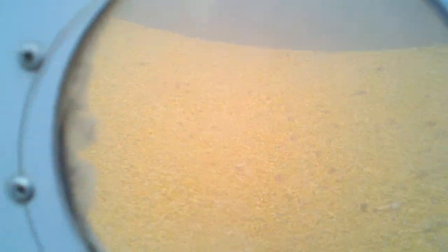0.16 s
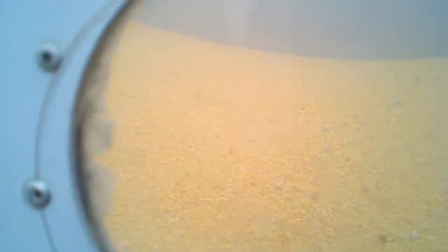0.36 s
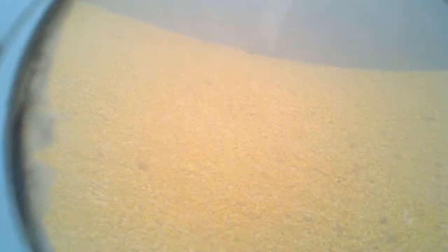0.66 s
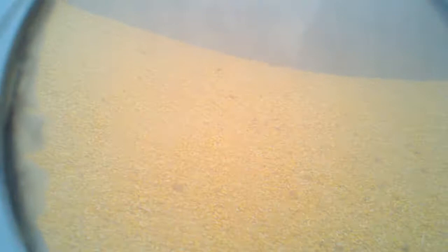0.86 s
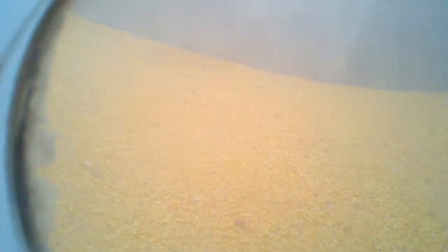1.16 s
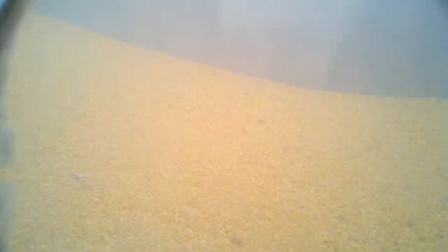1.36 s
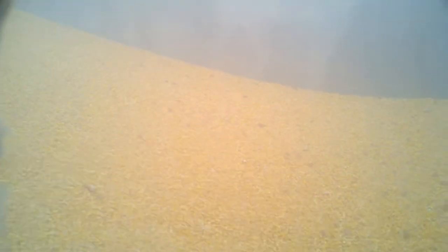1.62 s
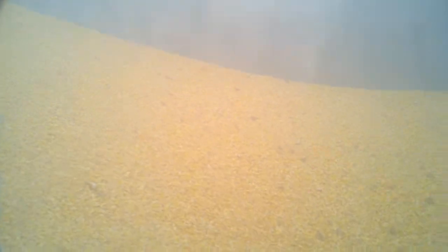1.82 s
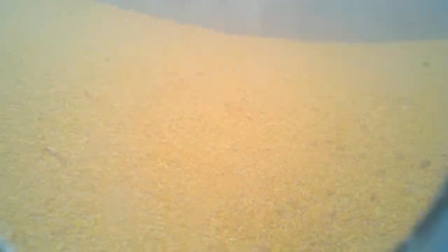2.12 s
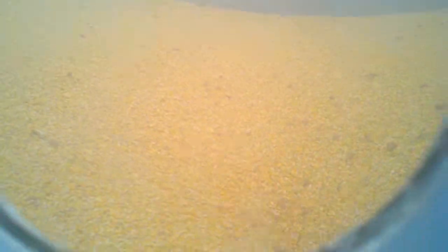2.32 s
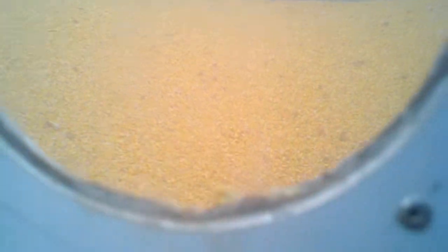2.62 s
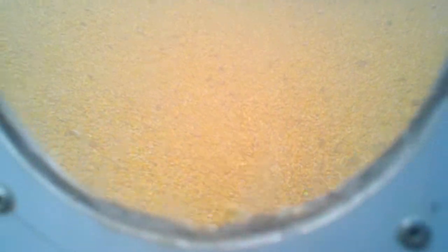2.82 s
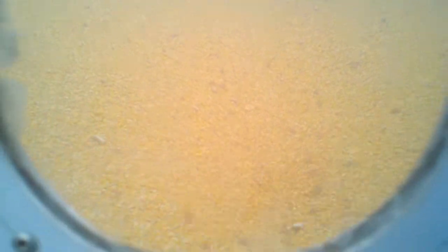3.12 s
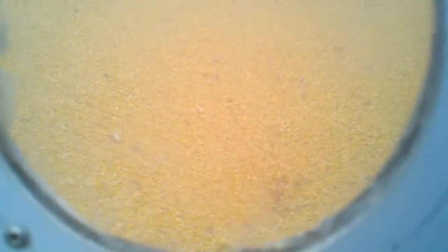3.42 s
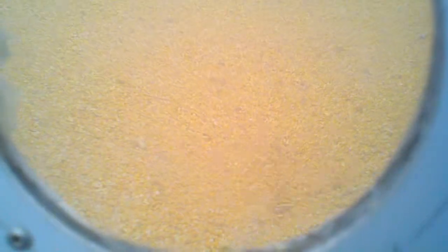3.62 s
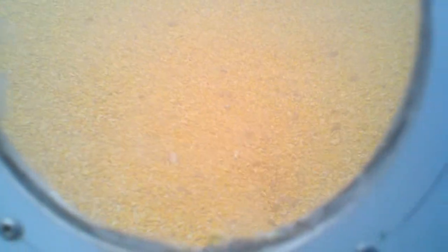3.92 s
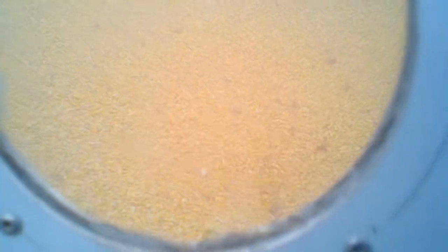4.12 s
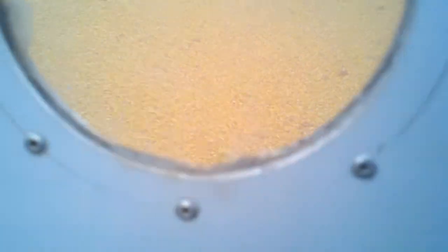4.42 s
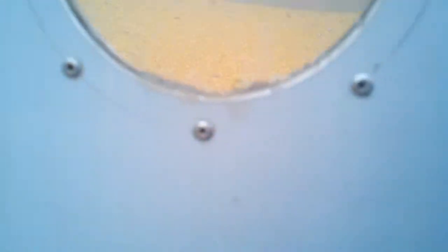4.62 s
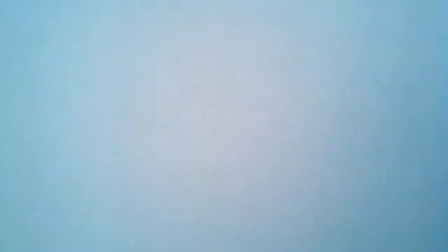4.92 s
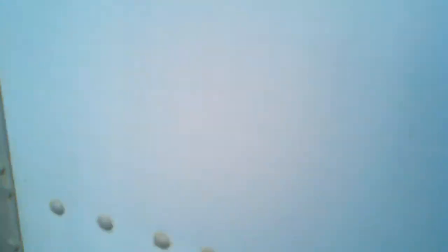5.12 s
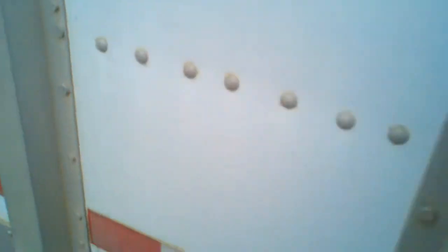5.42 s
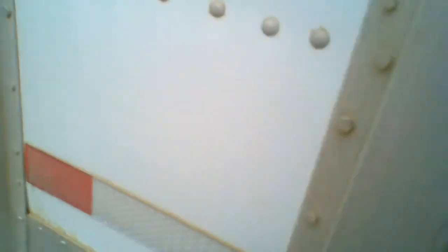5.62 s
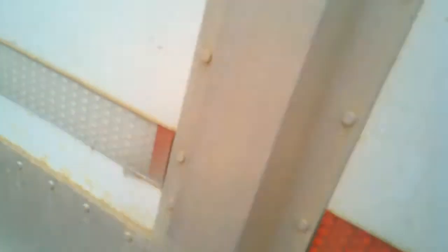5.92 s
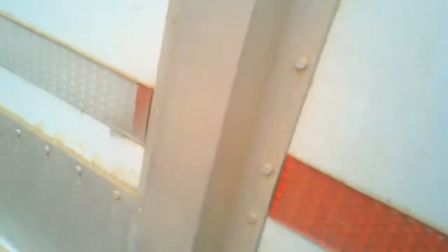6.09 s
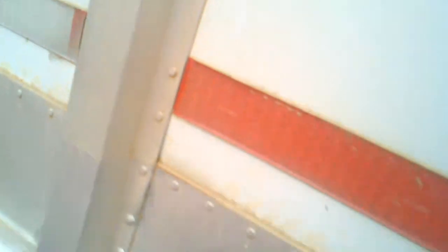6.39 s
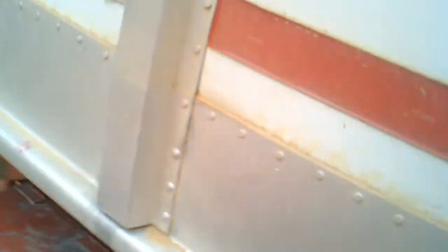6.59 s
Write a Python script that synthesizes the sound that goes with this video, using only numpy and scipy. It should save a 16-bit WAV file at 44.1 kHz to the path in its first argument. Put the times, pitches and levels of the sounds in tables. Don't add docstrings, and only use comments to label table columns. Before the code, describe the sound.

Loud, constant farm engine rumble and dense grainy hiss of flowing corn, dulling slightly late as low wind thumps hit the microphone.

```python
import sys
import numpy as np
from scipy import signal
from scipy.io import wavfile
from scipy.ndimage import uniform_filter1d, map_coordinates

SR = 44100
rng = np.random.default_rng(int(sys.argv[2]) if len(sys.argv) > 2 else 0)


def wav_record(signal):
    frames = np.transpose(np.atleast_2d(signal))
    bounded = np.clip(frames, -1, 1)
    quanta = np.round(bounded * 32767).astype(np.int16)
    wavfile.write(sys.argv[1], SR, quanta)


def invert_db(x):
    u = np.asarray(x, float) / 20
    return 10 ** u


N = 297655
TIME = np.arange(N) / SR
CYCLE_HZ = 16.9267
PORT_LAG = 17

# time in seconds, facing the engine casing [0-1],
# trailer wall in the way [0-1], nearness of the corn in dB.
CAMERA_HOLD = [(0, 0, 0, -0.7), (.75, .3, 0.01, 0.1), (1.05, 0.98, 0, -.6), (2.15, 0.87, 0, -1.1),
               (2.45, 0.4, 0, -0.2), (3.6, 0.06, 0.04, -0.1), (4.5, 0.1, 0.07, -.2), (4.9, .15, 0.05, 0),
               (5.3, 0.5, 0.18, 1.7), (5.7, 0.66, .3, 1.6), (5.9, 0.75, 0.4, 1), (6.08, 0.7, 0.58, 1.5),
               (6.25, 0.6, 0.9, 0.7), (6.75, 0.6, 1, 0)]


def curve(table):
    s, *columns = np.transpose(table)
    return [np.interp(TIME, s, column) for column in columns]


def at(table, hz):
    table_hz, values = np.transpose(table)
    return np.interp(np.log(hz + 1), np.log(table_hz), values)


def walk(rate, count, times):
    x = np.repeat(rng.standard_normal((count, int(rate * N / SR) + 2)), 16, axis=1)
    x = uniform_filter1d(uniform_filter1d(x, size=16), size=16)
    rows = [np.interp(times * rate * 16, np.arange(len(row)), row) for row in x]
    return np.array(rows) / x.std()


def grains(count, spread_db):
    x = rng.standard_normal((count, N)) * invert_db(spread_db * rng.exponential(size=(count, N)))
    return x / x.std()


def colour(x, power, patchy_db, rate):
    hz, _, z = signal.stft(x, SR, nperseg=2048)
    gain = np.sqrt(power(hz) * SR / 2)[:, None]
    x = signal.istft(z * gain, SR, nperseg=2048)[1][:, :N]
    hz, s, z = signal.stft(x, SR, nperseg=512)
    bands = walk(rate, count=12, times=s)
    band_place = np.clip(1.5 * np.log2(hz / 100 + 1), 0, 11)
    place = np.meshgrid(band_place, np.arange(len(s)), indexing="ij")
    flicker = invert_db(patchy_db * map_coordinates(bands, place, order=1))
    return signal.istft(z * flicker, SR, nperseg=512)[1][:, :N]


def split(x, hz):
    low = signal.sosfiltfilt(signal.butter(2, hz, fs=SR, output="sos"), x)
    return low, x - low


def late(x, samples):
    return np.roll(x, samples)


def ports(a, b, cross=0.99):
    return np.array([a - cross * late(b, PORT_LAG), b - cross * late(a, PORT_LAG)])


def aimed(away_db, turn_db, wall_db):
    facing, wall, _ = curve(CAMERA_HOLD)
    return away_db + turn_db * facing + wall_db * wall


def wind():
    # frequency in Hz, level in dB.
    eddy_spectrum = [(30, -26), (60, -11), (100, -2), (200, 0), (320, -2), (500, -8), (750, -13),
                     (1100, -18), (1700, -24), (2600, -42)]
    # time in seconds, level in dB, brightness in dB.
    buffets = [(5.175, -24, -11), (5.267, -29, -4), (5.61, -21.5, -8), (5.65, -24, -7), (5.72, -29, -2),
               (5.82, -22, -12), (5.95, -21, -11), (5.99, -26, -10), (6.025, -22.5, -3), (6.07, -21, -8),
               (6.117, -28, -7), (6.176, -26, -14), (6.24, -19, -10), (6.287, -27, -6), (6.355, -19, -6),
               (6.417, -20.5, -1), (6.465, -15.5, 0), (6.508, -14.5, 4), (6.542, -21, -6),
               (6.613, -21.5, -8), (6.69, -22, -8), (6.74, -24, -6)]
    usual_s, usual_db, shorter = 0.037, -24, 0.64
    rows = [(s, usual_s * invert_db(shorter * (usual_db - db)), db, bright_db) for s, db, bright_db in buffets]
    rows.append((6.0, 1.1, -33, -8))
    thump_power, rustle_power = 0, 0
    for s, length_s, db, bright_db in rows:
        shape = np.exp(-2 * ((TIME - s) / length_s) ** 2)
        thump_power = thump_power + invert_db(2 * db) * shape
        rustle_power = rustle_power + invert_db(2 * db + 2 * bright_db) * shape
    eddies = grains(count=1, spread_db=5)
    x = colour(eddies, lambda hz: invert_db(2 * at(eddy_spectrum, hz)), patchy_db=5.5, rate=25)[0]
    x = x / np.sqrt(uniform_filter1d(x ** 2, size=1100))
    low, high = split(x, 640)
    return ports(low * np.sqrt(thump_power) + high * np.sqrt(rustle_power), 0 * x)


def trade(combed, echo):
    hz, s, far = signal.stft(combed, SR, nperseg=512)
    near = signal.stft(echo, SR, nperseg=512)[2]
    steps = walk(42, count=14, times=s)
    notch = np.clip(hz * PORT_LAG * 2 / SR + .5, 0, 12).astype(int)
    treble = np.clip(hz / 2500 - 1.5, 0, 1)[:, None]
    shift = np.tanh(1.1 * steps[notch] + .6 * steps[13]) * treble
    return signal.istft(far * np.sqrt(1 + shift) + near * np.sqrt(1 - shift), SR, nperseg=512)[1][:, :N]


def corn(flow_db):
    # frequency in Hz, level in dB per Hz.
    kernel_spectrum = [(60, -75), (130, -64), (400, -64), (900, -66.5), (1600, -65.5), (2250, -66),
                       (2700, -69.5), (4100, -69.8), (4700, -73.5), (5600, -73.5), (6100, -70), (7600, -65),
                       (9200, -65.5), (13800, -70.5)]
    # frequency in Hz, level in dB against the corn.
    scatter_spectrum = [(600, -12), (950, -14), (1150, -32), (1450, -32), (2300, -28), (4050, -30),
                        (4450, -5), (5300, 0), (6500, 0), (9000, 0), (14000, 0)]
    screw_hz, screw_phase = 10.14, 1.24

    def direct_power(hz):
        return invert_db(2 * at(kernel_spectrum, hz))

    def echo_power(hz):
        return 2 * invert_db(2 * at(kernel_spectrum, hz) + 2 * at(scatter_spectrum, hz))

    turn = 2 * np.pi * screw_hz * TIME - screw_phase + 0.28 * walk(1.12, count=1, times=TIME)[0]
    surge = invert_db(flow_db + .72 * np.cos(turn) + .12 * np.cos(2 * turn - .8))
    a, b = colour(grains(count=2, spread_db=1.5), direct_power, patchy_db=0.74, rate=9)
    echo = colour(grains(count=2, spread_db=1.5), echo_power, patchy_db=1.1, rate=8.3)
    return surge * trade(ports(a * invert_db(1.0), b * invert_db(-2.0)), echo)


def rumble(low_db, mid_db, high_db):
    # frequency in Hz, level in dB per Hz.
    casing_spectrum = [(40, -65), (65, -65.5), (110, -58), (180, -49), (270, -51.5), (370, -51.5),
                       (500, -57), (750, -64.5), (1000, -71), (1500, -80.5), (2000, -83.5), (3000, -94)]
    # frequency in Hz, width in Hz, level in dB per Hz.
    sheet_metal = [(1560, 36, -69), (2300, 40, -70.5), (360, 28, -48)]

    def noise_power(hz):
        ring = sum(invert_db(2 * db) / (1 + (2 * (hz - ring_hz) / width_hz) ** 2) for ring_hz, width_hz, db in sheet_metal)
        return invert_db(2 * at(casing_spectrum, hz)) + ring

    x = colour(grains(count=1, spread_db=2.2), noise_power, patchy_db=.8, rate=8)[0]
    low, rest = split(x, 600)
    mid, high = split(rest, 1050)
    firing = 1 + 0.16 * np.cos(2 * np.pi * 3 * CYCLE_HZ * TIME)
    x = low * invert_db(low_db) + (mid * invert_db(mid_db) + high * invert_db(high_db)) * firing
    return ports(late(x, samples=2.7), x)


def tone(hz, left_db, right_db, wobble_db):
    # frequency in Hz, lag in radians.
    right_lags = [(100, 1.03), (150, 1.2), (250, 0.52), (450, -0.28), (600, -0.97), (800, 1.38),
                  (1400, -0.28)]
    phase = 2 * np.pi * (hz * TIME + rng.random())
    drift = np.interp(TIME, np.linspace(0, N / SR, 30), invert_db(wobble_db * rng.standard_normal(30)))
    left = invert_db(left_db) * np.sin(phase)
    right = invert_db(right_db) * np.sin(phase - at(right_lags, hz))
    return np.sqrt(2) * drift * np.array([left, right])


def gear_load():
    # start in seconds, end in seconds, level in dB.
    load_spells = [
        (.5, .9, -3),
        (1.9, 3.3, -0.5),
        (3.0, 4.95, 5),
        (5.45, 6.15, 7.5),
    ]
    idle_db, ramp_s = -12, 0.21

    def ramp(s):
        return np.clip(s / ramp_s, 0, 1)

    spells = [(db - idle_db) * ramp(TIME - start) * ramp(end - TIME) for start, end, db in load_spells]
    return idle_db + np.max(spells, axis=0)


def orders():
    # multiple of the engine cycle, left level in dB, right level in dB.
    strong_orders = [(6, -43, -29), (9, -49, -36), (12, -40, -26), (15, -51, -40), (24, -53, -40),
                     (33, -49, -41), (35, -47, -40), (36, -44, -46), (39, -46, -44), (42, -44, -44),
                     (46, -47, -42), (54, -48, -46), (84, -44, -45)]
    # multiple of the engine cycle, left level in dB, right level in dB.
    comb_levels = [(7, -63, -50), (12, -58, -46), (18, -51, -44), (26, -53, -47), (33, -47, -45),
                   (44, -51, -48), (57, -52, -49)]
    k, left_db, right_db = np.transpose(comb_levels)
    rows = list(strong_orders)
    for n in range(int(k[0]), int(k[-1]) + 1):
        scatter_db = 2.5 * rng.standard_normal(2)
        present = rng.random() > .3
        if present and n not in np.transpose(strong_orders)[0]:
            rows.append((n, np.interp(n, k, left_db) + scatter_db[0], np.interp(n, k, right_db) + scatter_db[1]))
    return rows


def engine():
    # frequency in Hz, left level in dB, right level in dB.
    pump_lines = [(165.5, -53, -35), (193, -48, -47), (248, -50, -43), (386.3, -42, -46), (413.2, -51, -36),
                  (496, -56, -51)]
    firing = invert_db(aimed(away_db=0, turn_db=-.5, wall_db=-2))
    second = invert_db(aimed(away_db=0.34, turn_db=-0.42, wall_db=-15.5))
    comb = invert_db(aimed(away_db=-1.85, turn_db=2.1, wall_db=-0.85))
    gear = invert_db(gear_load())
    out = 0
    for k, left_db, right_db in orders():
        if k < 9:
            level, wobble_db = firing, .4
        elif k < 16:
            level, wobble_db = second, .8
        elif k < 60:
            level, wobble_db = comb, 2.5
        else:
            level, wobble_db = gear, 1.5
        out = out + level * tone(k * CYCLE_HZ, left_db, right_db, wobble_db)
    for hz, left_db, right_db in pump_lines:
        out = out + second * tone(hz, left_db, right_db, wobble_db=0.0015 * hz)
    return out


def scene():
    machine = rumble(low_db=aimed(away_db=.5, turn_db=-2.5, wall_db=-7.5),
                     mid_db=aimed(away_db=-6.5, turn_db=14.3, wall_db=-5),
                     high_db=aimed(away_db=3.3, turn_db=-4.5, wall_db=-27))
    nearness_db = curve(CAMERA_HOLD)[2]
    thud, hiss = split(corn(nearness_db), 2200)
    thud = thud * invert_db(aimed(away_db=0, turn_db=0, wall_db=-3.5))
    return invert_db(0.13) * engine() + machine + thud + hiss + invert_db(4.5) * wind()


def top_cut(x):
    return signal.sosfilt(signal.butter(12, 15070, fs=SR, output="sos"), x)


def record(dry):
    x = dry * invert_db(np.array([[-.2], [.2]]))
    x = x / (1 + np.abs(x / .95) ** 4) ** .25
    x = signal.sosfilt(signal.ellip(16, .3, 80, 13935, fs=SR, output="sos"), x)
    return top_cut(x)


dry = scene()
out = record(dry)
wav_record(out)
```